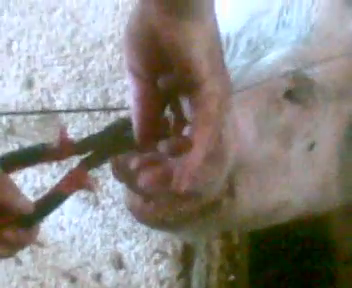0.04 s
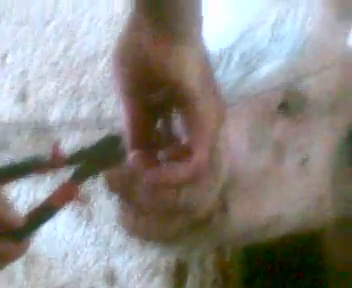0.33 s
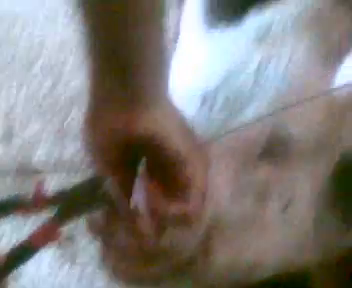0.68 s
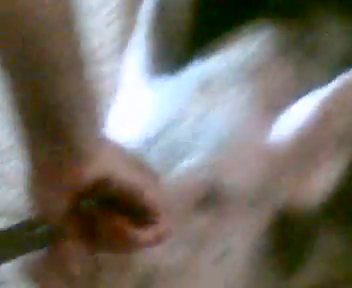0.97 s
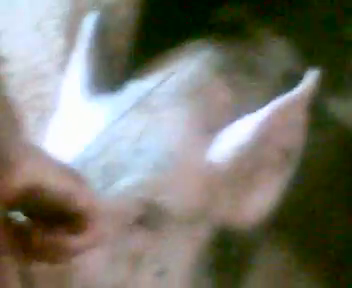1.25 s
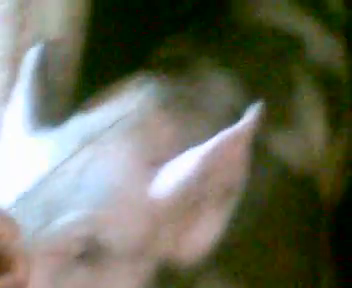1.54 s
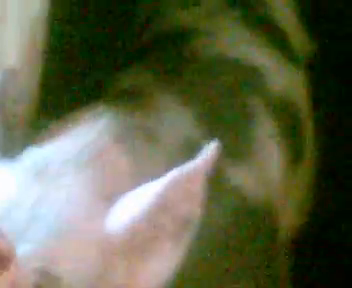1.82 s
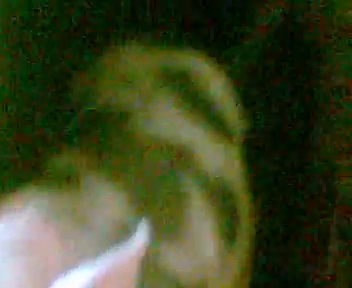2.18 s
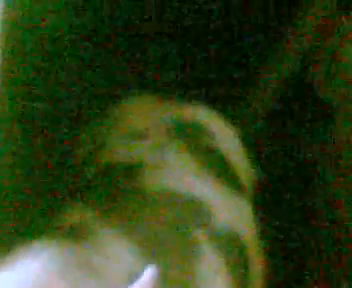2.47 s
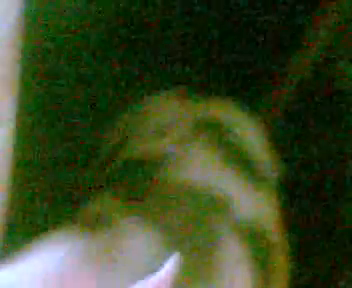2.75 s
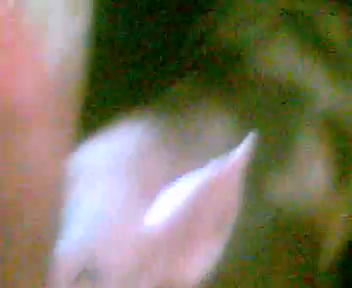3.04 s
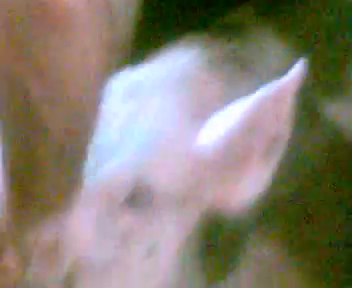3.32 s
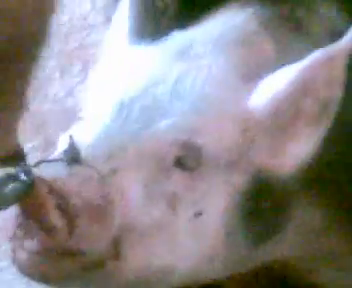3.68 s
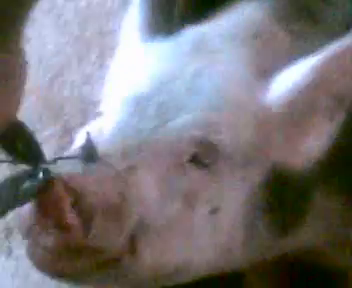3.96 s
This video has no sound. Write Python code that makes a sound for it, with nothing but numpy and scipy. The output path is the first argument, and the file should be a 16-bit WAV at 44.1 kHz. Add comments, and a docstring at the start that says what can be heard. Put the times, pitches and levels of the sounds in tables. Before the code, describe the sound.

A pig squeals close by from the start, shrill and raspy, until the pitch collapses at about 1.4 seconds and rings briefly in a hard-walled sty. Near 2 seconds a short hoarse bark opens a second squeal, which climbs slightly and holds, cracks around 3.6 seconds and rattles harshly until about 4 seconds. Very faint room noise and electrical hum lie underneath.

```python
"""A shrill squeal from a restrained pig, close by, collapses in pitch and rings out in a hard-walled sty.
A second squeal opens with a hoarse bark, climbs, cracks and ends in a harsh rattle.
The voice has two oscillators: a whistle near 1.6 kHz and a lower buzz that modulates it into sidebands.
Air rushes through the throat in time with the buzz; faint room noise and mains hum lie underneath."""
import sys
import numpy as np
from scipy import signal
from scipy.fft import rfft, irfft
from scipy.io import wavfile

SR = 44100
rng = np.random.default_rng(int(sys.argv[2]) if len(sys.argv) > 2 else 0)


def inscribe(sig):
    """Save sig as 16-bit PCM at rate SR to the path in sys.argv[1].

    A 1-D sig is mono; a 2-D sig holds one channel per row.
    Samples are clipped to [-1, 1] before scaling.
    """
    pcm = np.round(np.clip(np.atleast_2d(sig).T, -1, 1) * 32767)
    wavfile.write(sys.argv[1], SR, pcm.astype(np.int16))


N = 176400
T = np.arange(N) / SR
JITTER_HZ, FLUTTER_HZ, SHIMMER_HZ = 80, 500, 28  # rates of the voice's random wavering


def undb(db):
    """Decibels to amplitude ratio."""
    return 10 ** (np.asarray(db) / 20)


def unit(x):
    """Normalisation to rms 1."""
    return x / np.sqrt(np.mean(x ** 2))


def curves(rows):
    """Linear interpolation of a table's columns over time."""
    times, *columns = np.array(rows, float).T
    return [np.interp(T, times, column) for column in columns]


def walk(rate):
    """Low-passed noise of rms 1 that changes about rate times a second."""
    hz = np.fft.rfftfreq(N, 1 / SR)
    return unit(irfft(rfft(rng.standard_normal(N)) / (1 + (2 * hz / rate) ** 4), N))


def noise(points):
    """Spectral shaping: noise of rms 1 that follows (frequency [Hz], level [dB]) points."""
    hz, db = np.array(points, float).T
    gain = undb(np.interp(np.log(np.fft.rfftfreq(N, 1 / SR) + 1), np.log(hz), db))
    return unit(irfft(rfft(rng.standard_normal(N)) * gain, N))


def background():
    """Superposition of faint broadband room noise and a pure tone of mains hum."""
    # room noise spectrum (frequency [Hz], relative density [dB])
    floor = [(60, -6), (130, -2), (220, -7.5), (2000, -13), (7000, -19)]
    return undb(-69.5) * noise(floor) + undb(-80) * np.sqrt(2) * np.sin(2 * np.pi * 126 * T)


def sty(x, low_t60_s=.88, treble_t60_s=.47, tail_db=-5):
    """Reverberation: hard walls return a diffuse tail whose treble dies sooner."""
    echoes = rng.standard_normal(N)
    low = signal.sosfilt(signal.butter(2, 2500, fs=SR, output="sos"), echoes, zi=np.zeros((1, 2)))[0]
    low = signal.sosfilt(signal.butter(2, 2500, fs=SR, output="sos"), low[::-1])[::-1]
    tail = low * undb(-60 * T / low_t60_s) + (echoes - low) * undb(-60 * T / treble_t60_s)
    return x + undb(tail_db) * signal.fftconvolve(x, unit(tail) / np.sqrt(N))[:N]


def bark(attack_s=.021, hold_s=.032, decay_s=.013):
    """Resonance: a hoarse burst of air excites the mouth's formants one after another as it opens."""
    # formants (centre [Hz], width [Hz], relative level [dB], onset [s])
    formants = [(288, 60, -2, 1.94), (732, 160, 0, 1.936), (1268, 222, 3.5, 1.966), (2147, 77, -11.5, 1.94),
                (2655, 1440, -8.5, 1.935), (4176, 1130, -2.5, 1.935), (5090, 1350, -3, 1.939),
                (7090, 700, -13.5, 1.962)]
    hz = np.fft.rfftfreq(N, 1 / SR)
    air = rfft(rng.standard_normal(N))
    rings = [undb(db) * irfft(air / (1 + (2 * (hz - centre) / width) ** 2) ** 2, N)
             for centre, width, db, _ in formants]
    age = T - np.array(formants)[:, 3:]
    envelope = np.clip(age / attack_s, 0, 1) * np.exp(-np.maximum(age - attack_s - hold_s, 0) / decay_s)
    return undb(-29) * np.sum(envelope * rings, axis=0) / np.std(sum(rings))


def phase(hz):
    """An oscillator's phase is the integral of its frequency."""
    return 2 * np.pi * np.cumsum(hz) / SR


def rattle(peak_s=3.79, width_s=.085, rate_hz=66, depth=.011):
    """Frequency modulation: at peak strain the throat shakes the whistle by a fraction of its pitch."""
    strain = np.exp(-((T - peak_s) / width_s) ** 2)
    return depth * strain * np.sin(phase(rate_hz * (1 + walk(JITTER_HZ) / 10)))


def buzz_tone(buzz, whistle):
    """The buzz's harmonic series, plus a difference tone at the whistle's pitch less twice the buzz's."""
    # buzz harmonics 1-3 (relative level [dB])
    partials = [-1.5, -6.5, -27]
    series = sum(undb(db) * np.sin(k * buzz) for k, db in enumerate(partials, 1))
    return series + undb(-14) * np.sin(whistle - 2 * buzz)


def whistle_tone(whistle, buzz, drives_db, depth_db, rasp, shimmer_db=1.5):
    """Modulation by the buzz puts sidebands on each harmonic; period doubling adds one half a step up."""
    # whistle harmonics 1-5, relative levels
    # (harmonic [dB], upper sideband [dB], lower sideband [dB], second pair against first [dB])
    harmonics = [(0, -23, -31, -15.5), (-2, -6.5, -30, -6.5), (-1, -3.5, -13, -12.5),
                 (-13.5, -3.5, -4.5, -12.5), (-34, -9, -18.5, -9.5)]
    doubling = undb(-16.5) * np.sqrt(rasp) * walk(JITTER_HZ)
    tone = 0
    for k, ((db, above_db, below_db, far_db), drive_db) in enumerate(zip(harmonics, drives_db), 1):
        carrier = k * whistle
        sidebands = doubling * undb(above_db / 2) * np.sin(carrier + buzz / 2)
        for m in (1, 2):
            above = undb(above_db) * np.sin(carrier + m * buzz)
            below = undb(below_db) * np.sin(carrier - m * buzz)
            sidebands += undb(far_db * (m - 1)) * (above + below)
        gain = undb(drive_db + db + shimmer_db * walk(SHIMMER_HZ))
        tone += gain * (np.sin(carrier) + undb(depth_db) * sidebands)
    return tone


def squeal(pitch, fundamental, levels, span_s, jitter, air_db, edge_s=.008):
    """Biphonation: whistle and buzz sound together, rasp unsettles both, and airflow follows effort."""
    # voice quality (time [s], sideband depth [dB], rasp [dB], lift of harmonic 5 [dB])
    quality = [(0, -5, -4, -2.5), (.95, -7, -4, -10.5), (1.1, -6.5, -0.5, -12), (1.38, -6, -0.5, -5),
               (1.43, -3.5, 7.5, -4), (2.005, 0, -2, 16.5), (2.06, -21.5, -16.5, 32), (2.2, -19, -17, 38),
               (2.33, -15.5, -9, -3), (2.41, -17.5, -9.5, -4.5), (2.44, -4.5, -14.5, -2.5),
               (2.66, -4, -13, -10.5), (2.69, 3.5, -10, -7), (2.75, -2.5, -10, -9.5),
               (3.55, -3.5, -8.5, -0.5), (3.8, 5, -2, 13.5), (4, -3.5, -2.5, 10)]
    # air rushing through the throat (frequency [Hz], relative density [dB])
    throat = [(270, -43.5), (400, -7.5), (600, -20), (830, 0), (1080, -18), (1400, -20.5), (1720, 4),
              (2050, -23), (2600, -42.5), (3050, -27), (3450, 2), (3750, -7), (4300, -9.5), (4850, 7),
              (5250, -3), (6200, -1), (7400, -17)]
    whistle_hz, buzz_hz = curves(pitch)
    first_db, = curves(fundamental)
    octave_db, upper_db, buzz_db = curves(levels)
    depth_db, rasp_db, top_db = curves(quality)
    rasp = undb(rasp_db)
    waver = rattle() + jitter * walk(JITTER_HZ) + .0035 * rasp ** 2 * walk(FLUTTER_HZ)
    whistle = phase(whistle_hz * (1 + waver))
    buzz = phase(buzz_hz * (1 + .007 * walk(JITTER_HZ) + .026 * rasp * walk(FLUTTER_HZ)))
    drives_db = [first_db, octave_db, upper_db, upper_db, upper_db + top_db]
    voice = undb(buzz_db) * buzz_tone(buzz, whistle)
    voice += whistle_tone(whistle, buzz, drives_db, depth_db, rasp)
    air = undb(air_db + upper_db) * rasp * noise(throat) * (1 + np.cos(buzz))
    gate = np.clip(np.minimum(T - span_s[0], span_s[1] - T) / edge_s, 0, 1)
    return gate * (np.sqrt(2) * voice + air)


def scene():
    """Two squeals and a bark superpose in the reverberant sty; the second squeal has more pitch jitter."""
    # oscillator pitches in each squeal (time [s], whistle [Hz], buzz [Hz])
    pitch_1 = [(0, 1531, 376.4), (.23, 1535, 376.6), (.34, 1547, 382.8), (.64, 1571, 383.7),
               (.78, 1550, 373.3), (1.06, 1541, 374.2), (1.21, 1553, 358.5), (1.365, 1577, 371.7),
               (1.392, 1545, 368), (1.44, 1291, 350)]
    pitch_2 = [(2.005, 1277, 285), (2.05, 1499, 337), (2.14, 1463, 347), (2.2, 1463, 354.8),
               (2.33, 1560, 365.5), (2.46, 1645, 379), (2.52, 1632, 385.4), (2.645, 1657, 396.7),
               (2.69, 1615, 372), (2.81, 1639, 384.6), (2.94, 1683, 407.4), (3.08, 1651, 394.2),
               (3.29, 1674, 409.7), (3.47, 1655, 406.5), (3.56, 1632, 412.8), (3.59, 1648, 482.6),
               (3.68, 1606, 504.8), (3.82, 1637, 531.7), (4, 1574, 482.5)]
    # drive of the whistle's fundamental (time [s], level [dB])
    fundamental_1 = [(0.0, -33.5), (0.45, -32), (0.498, -42.5), (0.8, -24.5), (1.146, -32.5), (1.214, -25),
                     (1.33, -37.5), (1.39, -25), (1.44, -50)]
    fundamental_2 = [(2.01, -37), (2.049, -38.5), (2.3, -35), (2.6, -26), (2.681, -35.5), (2.95, -25),
                     (3.2, -28.5), (3.35, -20.5), (3.42, -35), (3.47, -25.5), (4.0, -32.5)]
    # other drives (time [s], whistle octave [dB], whistle harmonics 3-5 [dB], buzz [dB])
    levels_1 = [(0.0, -38.5, -29, -47), (0.514, -34, -32, -51), (0.952, -35.5, -29.5, -46),
                (1.264, -32.5, -34, -60), (1.4, -39.5, -32.5, -55.5), (1.44, -52.5, -47, -61.5)]
    levels_2 = [(2.001, -48, -46.5, -66), (2.299, -57.5, -39.5, -72.5), (2.33, -55, -29, -52.5),
                (2.41, -55.5, -30.5, -53.5), (2.45, -42.5, -33.5, -48.5), (2.82, -26.5, -30, -46),
                (2.91, -37, -31, -40.5), (3.201, -33.5, -32, -44), (4.0, -37, -31, -52)]
    first = squeal(pitch_1, fundamental_1, levels_1, span_s=(0, 1.447), jitter=.0014, air_db=-13.5)
    second = squeal(pitch_2, fundamental_2, levels_2, span_s=(1.995, 4.1), jitter=.0026, air_db=-15.5)
    return (sty(first + bark() + second) + background())[None]


def record(dry, dull_hz=7600, sampling_hz=16000, image_db=-25, top_hz=8900):
    """Imaging: a small recorder dulls the top, mirrors it about half its sampling rate, then cuts it."""
    dull = signal.sosfilt(signal.butter(24, dull_hz, fs=SR, output="sos"), dry)
    mirrored = dull * (1 + 2 * undb(image_db) * np.cos(2 * np.pi * sampling_hz * T))
    return signal.sosfilt(signal.ellip(10, .2, 80, top_hz, fs=SR, output="sos"), mirrored)


dry = scene()
out = record(dry)
inscribe(out)
```